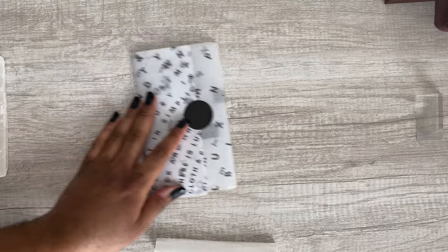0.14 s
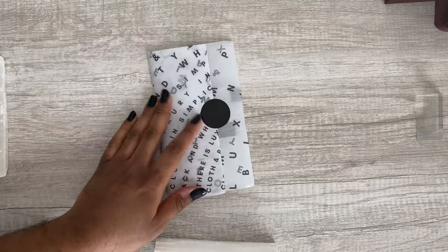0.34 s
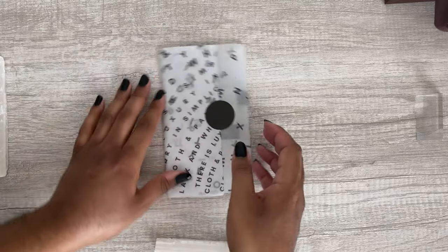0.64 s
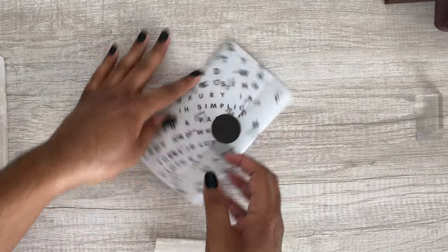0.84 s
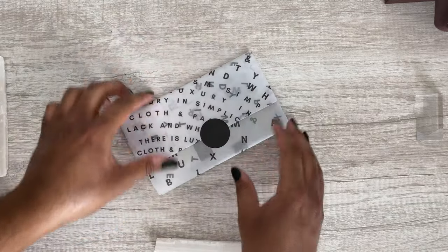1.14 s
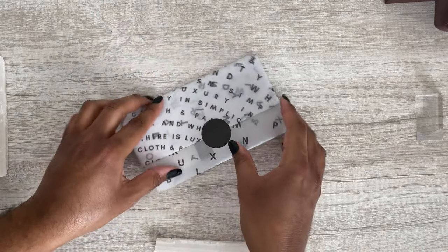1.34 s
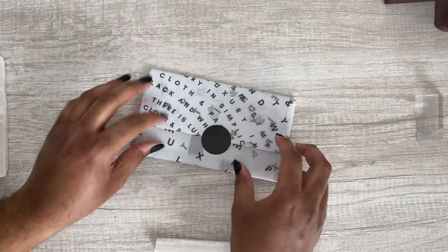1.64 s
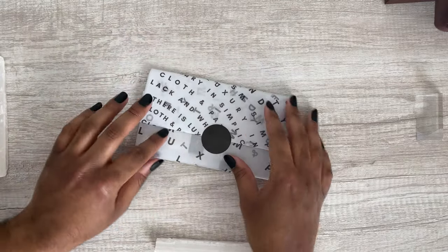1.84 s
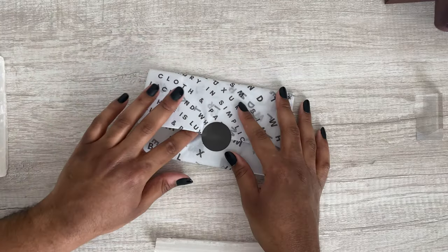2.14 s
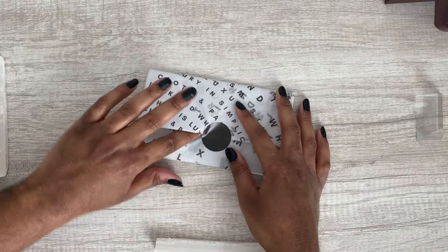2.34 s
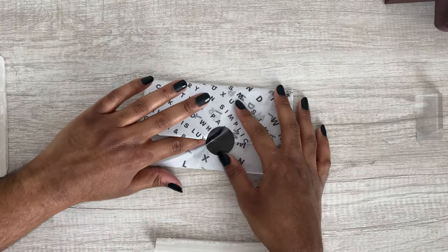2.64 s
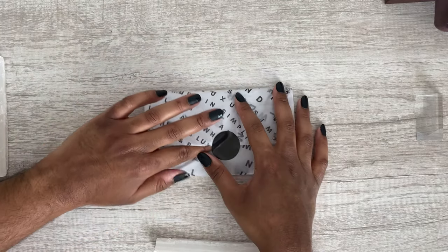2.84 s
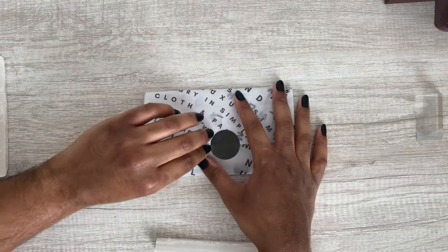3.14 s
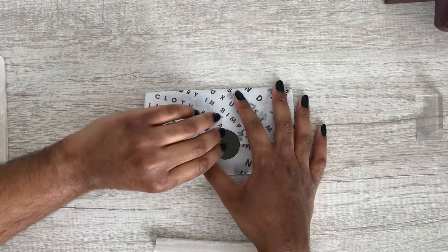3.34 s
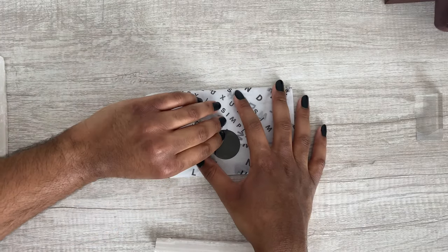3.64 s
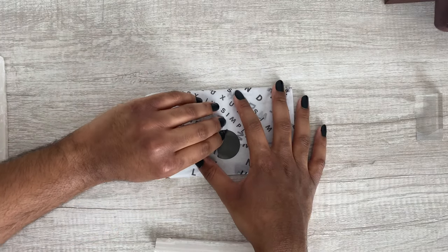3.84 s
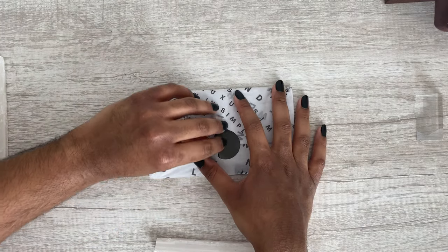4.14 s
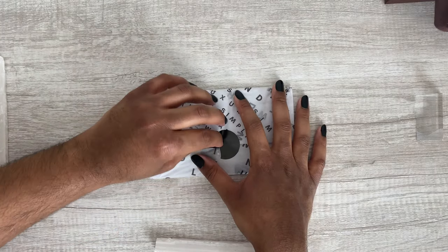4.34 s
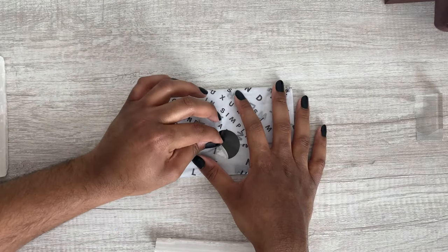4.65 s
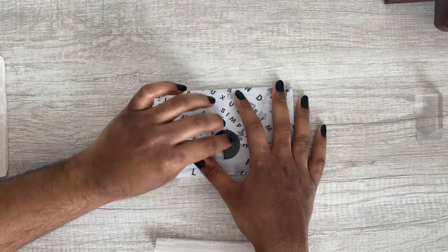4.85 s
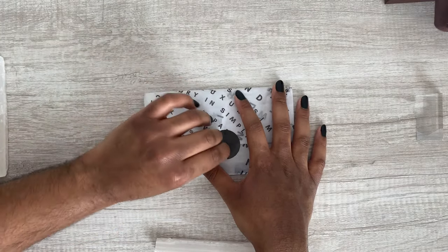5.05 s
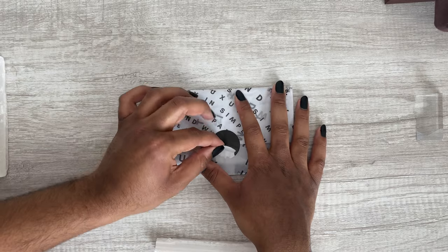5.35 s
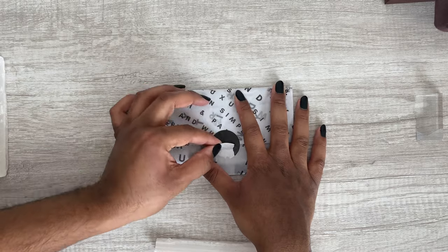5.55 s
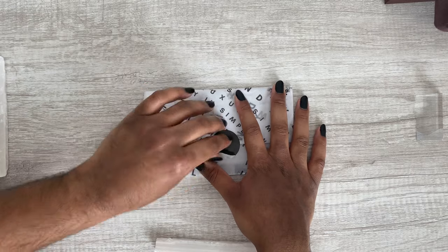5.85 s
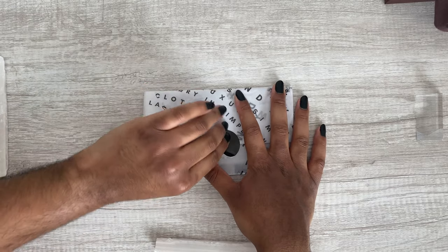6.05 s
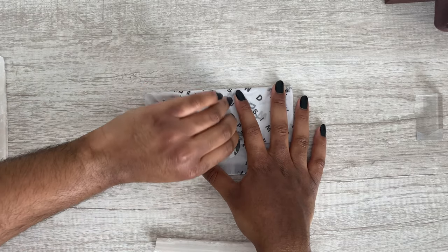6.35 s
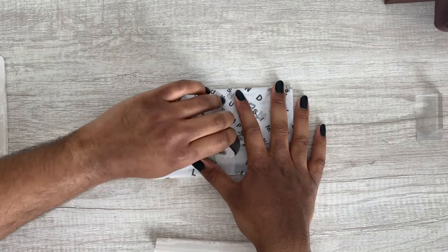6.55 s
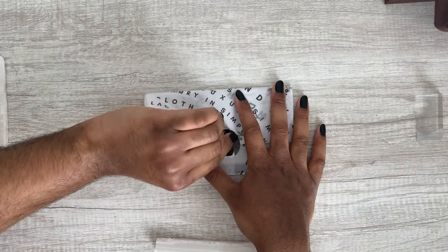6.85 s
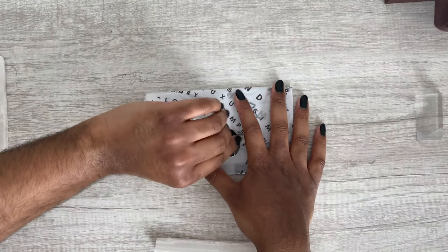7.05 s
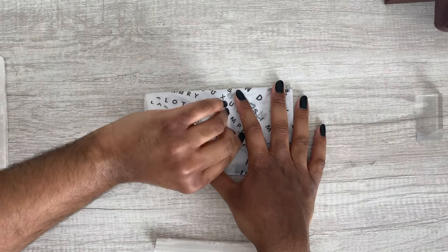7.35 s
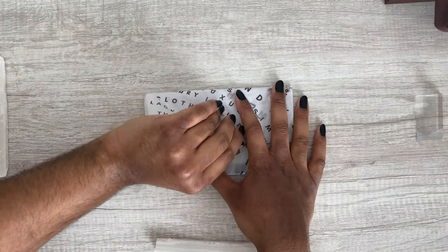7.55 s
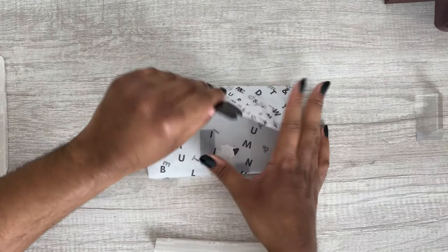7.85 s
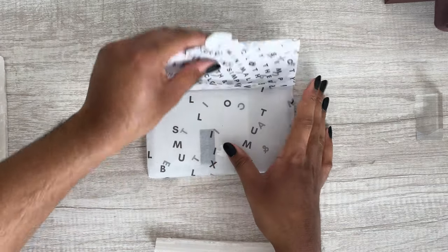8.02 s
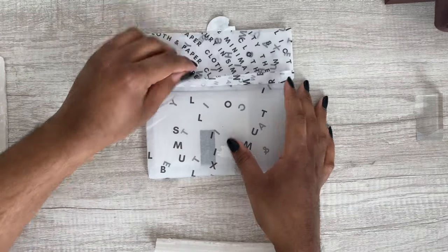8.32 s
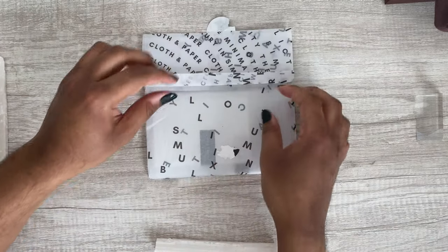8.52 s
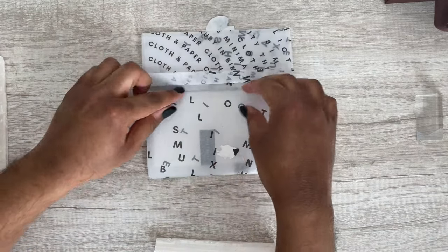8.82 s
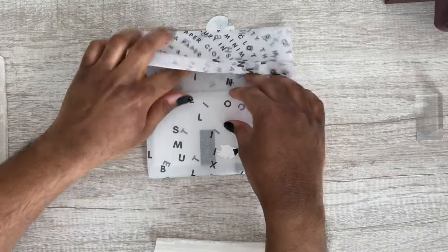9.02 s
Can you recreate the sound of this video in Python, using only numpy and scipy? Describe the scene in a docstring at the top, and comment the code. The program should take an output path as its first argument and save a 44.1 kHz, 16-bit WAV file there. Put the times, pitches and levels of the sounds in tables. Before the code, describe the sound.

A thin, crisp paper packet is slid and turned on a wooden desk with airy swishes, nail taps and a dull thud. Then fingertips press and pick at it in short, irregular crinkles with small snaps and hollow pops, growing busier until the flap peels open in a bright rustle. A low motor hum wavers beneath. Small room, close stereo microphone from above.

```python
"""Tissue paper rustles on a wooden desk as hands slide and turn a packet, pick its sticker and fold the flap open.
Shaped noise makes the hiss of rubbing fibres, clusters of random decays make the crinkle, and noise bursts make
the snaps and nail taps. Short sine modes make hollow pops, and a ringing desk top thuds under packet and fingers.
Beyond the small room a slow motor hums in wavering sine partials, over a faint room tone.
A close pair of microphone ports listens from above."""
import sys
import numpy as np
from scipy import signal
from scipy.fft import rfft, irfft
from scipy.io import wavfile
from scipy.ndimage import uniform_filter1d, map_coordinates

SR = 44100
rng = np.random.default_rng(int(sys.argv[2]) if len(sys.argv) > 2 else 0)


def store_wav(level_fs):
    """Save 16-bit WAV to argv[1]."""
    pcm = np.round(np.clip(np.atleast_2d(level_fs), -1, 1) * 32767)
    wavfile.write(sys.argv[1], SR, pcm.T.astype(np.int16))


N = 404838


def undb(db):
    """Decibels to gain."""
    return 10 ** (np.asarray(db) / 20)


def unit(x):
    """Scale to rms 1."""
    return x / np.sqrt(np.mean(x ** 2))


def curves(table):
    """Draw each column of a table as a value per sample, against seconds in its first column."""
    s, *columns = np.transpose(table)
    return [np.interp(np.arange(N) / SR, s, c) for c in columns]


def per_bin(points):
    """Join (Hz, value) points on a log-frequency axis, one value per spectrum bin."""
    hz, value = np.transpose(points)
    bin_hz = np.arange(N // 2 + 1) * SR / N
    return np.interp(np.log1p(bin_hz), np.log1p(hz), value)


def colour(x, spectrum):
    """Give a sound a spectrum, rms 1."""
    return unit(irfft(rfft(x) * undb(per_bin(spectrum)), N))


def noise(spectrum):
    """Two unrelated noises of one colour, rms 1."""
    return colour(rng.standard_normal((2, N)), spectrum)


def walk(rate):
    """Random levels, each lasting 1 / rate seconds, smoothed twice; rms 1."""
    hold = max(int(SR / rate), 1)
    steps = np.repeat(rng.standard_normal(N // hold + 1), hold)
    return unit(uniform_filter1d(uniform_filter1d(steps, hold), hold)[:N])


def fade(x, decay_s):
    """Give every impulse an exponential tail."""
    return signal.lfilter([1], [1, -np.exp(-1 / (decay_s * SR))], x)


def resonate(x, hz, q):
    """One broad resonance."""
    return signal.lfilter(*signal.iirpeak(min(hz, SR / 3), max(q, 1), fs=SR), x)


def above(x, hz):
    """The part of a sound above a frequency, without phase shift."""
    return signal.sosfiltfilt(signal.butter(2, hz, "high", fs=SR, output="sos"), x)


# Colour of the room tone. Each row: frequency in Hz, relative level in dB per Hz.
ROOM_TONE = [(32, -19), (52, 4), (130, -0.5), (300, -22), (550, -22), (1000, -35.5), (2000, -41),
             (5000, -36.5), (15000, -61)]


def room_tone():
    """Faint steady noise, strongest in the bass."""
    return undb(-38.5) * noise(ROOM_TONE)


# Partials of the hum. Each row: multiple of the pulse rate, relative level in dB.
MOTOR_ORDERS = [(2, -12.5), (4, 0), (5, -8)]
# The motor slows under load. Each row: middle in seconds, drop of the pulse rate in Hz.
MOTOR_SAGS = [(2.55, 0.74), (3.5, 0.97), (6.55, 0.843)]
# Slow level of the hum. Each row: time in seconds, relative level in dB.
HUM_LEVEL = [(0, -41), (.14, -31), (.26, -36), (.58, -27.5), (3.2, -28), (4.5, -28.5), (5.1, -31.5),
             (8.9, -30.5)]
# The hum dips suddenly and recovers. Each row: start in seconds, depth setting in dB.
HUM_DIPS = [(3.54, 14), (4.85, 4.7), (5.72, 8.1), (7.45, 4.1)]
MOTOR_HZ, SAG_WIDTH_S = 26.08, 0.2212  # pulse rate without sag, width of a sag
DIP_FALL_S, DIP_RECOVER_S = 0.024, 0.2


def motor():
    """Low partials of a slow motor that sags now and then; each wavers by itself in level and phase."""
    t = np.arange(N) / SR
    pulse_hz = MOTOR_HZ - sum(drop * np.exp(-((t - s) / SAG_WIDTH_S) ** 2) for s, drop in MOTOR_SAGS)
    level_db = curves(HUM_LEVEL)[0]
    for s, depth_db in HUM_DIPS:
        fall = np.clip((t - s) / DIP_FALL_S, 0, 1)
        level_db = level_db - depth_db * fall * np.exp(-((t - s) / DIP_RECOVER_S) ** 2)
    turn = 2 * np.pi * np.cumsum(pulse_hz) / SR
    hum = 0
    for order, part_db in MOTOR_ORDERS:
        level = undb(part_db + 2.4 * walk(12))
        phase = 2 * np.pi * rng.random() + 0.36 * walk(13)
        hum = hum + level * np.sin(round(order) * turn + phase)
    return np.sqrt(2) * undb(level_db - 1.25) * hum


def room(x, t60_s=0.15, wet_db=-16.0):
    """The short reverberation of a small furnished room: slightly dulled noise that decays exponentially."""
    t = np.arange(SR // 2) / SR
    tail = rng.standard_normal((2, len(t))) * undb(-60 * t / t60_s) * (t > .004)
    tail = fade(tail, .00003)
    tail /= np.sqrt(np.sum(tail ** 2, axis=1, keepdims=True))
    return x + undb(wet_db) * signal.fftconvolve(x, tail, axes=1)[:, :N]


# Phase between the ports. Each row: frequency in Hz, lead of the left in radians.
PORT_PHASE = [(1600, .1), (2700, -.9), (6000, -1), (7500, .4), (8400, 2.9), (9200, 3.4), (10500, 6.2),
              (12000, 6.4), (12900, 9.2), (14100, 9.6), (15100, 12.6)]
# Likeness of the ports. Each row: frequency in Hz, likeness from 0 to 1.
PORT_LIKENESS = [(100, 0.38), (500, 0.62), (1900, 0.85), (3000, 0.62), (5300, 0.33), (7200, 0.43),
                 (8500, 0.99)]
# Balance of the ports. Each row: frequency in Hz, left minus right in dB.
PORT_BALANCE = [(1800, -0.5), (4000, -2), (5700, -8.5), (7200, -1), (8500, 0)]


def ports(x):
    """Shared and unshared sound reach two ports, whose likeness, balance and phase vary with frequency."""
    shared, apart = rfft(x)
    likeness = np.clip(per_bin(PORT_LIKENESS), 0, 1)
    sides = np.array([[1], [-1]])
    pair = shared * np.sqrt((1 + likeness) / 2) + sides * apart * np.sqrt((1 - likeness) / 2)
    pair = pair * undb(sides * per_bin(PORT_BALANCE) / 2)
    return irfft(pair * np.exp(1j * sides * per_bin(PORT_PHASE) / 2), N)


# Modes of the desk top. Each row: frequency in Hz, relative level in dB, 60 dB decay time in seconds.
DESK = [(153, -6, 0.13), (222, -5, 0.12), (246, -2, 0.13), (282, 0, 0.085), (315, 5, 0.061),
        (385, -3, 0.038), (515, -1.5, 0.045), (690, -2, 0.035)]
DESK_RISE_S = .002  # time that the desk top takes to get moving


def desk_ring():
    """The desk top after a sharp tap: decaying modes that take a few milliseconds to build up."""
    t = np.arange(SR // 3) / SR
    modes = sum(undb(db - 60 * t / t60) * np.sin(2 * np.pi * hz * t) for hz, db, t60 in DESK)
    return (1 - np.exp(-t / DESK_RISE_S)) * modes


# Packet and fingers knock the desk. Each row: start in seconds, relative level in dB.
KNOCKS = [(0.566, -17.5), (0.743, -19), (1.132, -6), (1.159, -13), (1.376, -23), (1.421, -14), (3.917, -27),
          (4.158, -27), (4.212, -25.5), (5.368, -23), (5.49, -21.5), (6.116, -26), (6.587, -17),
          (6.968, -21.5), (8.897, -21.5)]


def desk(push_s=0.0007, rattle_db=-7.0, rattle_s=0.016):
    """A soft push rings the desk top; the packet shuffles briefly as it settles."""
    out, ring = np.zeros((2, N + SR)), desk_ring()
    t = np.arange(len(ring)) / SR
    push = t / push_s * np.exp(-2 * t / push_s)
    for s, db in KNOCKS:
        shuffle = rng.standard_normal((2, len(t))) * np.exp(-t / rattle_s)
        thud = undb(rattle_db) * unit(signal.fftconvolve(shuffle, ring[None])[:, :len(t)])
        # row 0 is the sound that both ports share, and the push belongs to it alone
        thud[0] += unit(signal.fftconvolve(push, ring)[:len(t)])
        start = int(s * SR)
        out[:, start:start + len(t)] += undb(db) * thud / np.abs(thud[0]).max()
    return out[:, :N]


# Bulges of the packet that flip. Each row: start in seconds, relative level in dB, pitch in Hz.
POPS = [(0.566, -20, 720), (1.165, -21, 1000), (1.177, -18, 700), (1.398, -15, 800), (1.548, -15, 1000),
        (2.661, -17, 1000), (3.868, -23, 1300), (4.33, -20, 1250), (4.555, -17, 1900), (6.509, -17, 1100),
        (6.585, -17, 1240), (7.776, -15, 764), (7.812, -16, 900), (7.836, -15, 780), (7.934, -15, 1400)]


def pops(ring_s=0.0038, overtone=1.42, overtone_db=-5.0, flutter_db=-3.0, flutter_s=0.005):
    """A bulge flips over with a hollow ring in two short modes, then flutters as it settles."""
    out, t = np.zeros((2, N + SR)), np.arange(SR // 16) / SR
    for s, db, hz in POPS:
        turn = 2 * np.pi * hz * t
        ring = np.exp(-t / ring_s) * (np.sin(turn) - undb(overtone_db) * np.sin(overtone * turn))
        jitter = rng.standard_normal(len(t)) * np.exp(-t / flutter_s)
        flutter = signal.fftconvolve(jitter, ring)[:len(t)]
        sound = unit(ring) + undb(flutter_db) * unit(flutter)
        start = int(s * SR)
        out[0, start:start + len(t)] += undb(db) * sound / np.abs(sound).max()
    return out[:, :N]


# Colour of the packet's ring. Each row: frequency in Hz, relative level in dB per Hz.
PACKET = [(1000, -39), (1700, -13), (2130, 2.5), (2450, -3), (2900, 3), (3450, -7), (3850, -7), (7000, -16)]
# Fingernails tap the packet. Each row: start in seconds, relative level in dB.
TAPS = [(0.545, -17), (0.859, -8), (0.875, -12), (2.195, -15), (2.264, -16), (2.332, -11), (2.379, -12),
        (3.031, -13), (3.111, -9), (3.157, -13), (3.241, -16), (3.637, -19), (3.646, -18), (3.79, -17),
        (3.833, -13), (4.268, -13), (4.702, -20)]


def taps(contact_s=0.0009, tap_db=1.5):
    """A nail lands with a brief scrape: a short burst of noise in the colour of the packet."""
    out, t = np.zeros((2, N + SR)), np.arange(SR // 20) / SR
    ring = noise(PACKET)
    shape = t / contact_s * np.exp(-t / contact_s)
    for s, db in TAPS:
        span = slice(int(s * SR), int(s * SR) + len(t))
        sound = ring[:, span] * shape
        out[:, span] += undb(db + tap_db) * sound / np.abs(sound).max(axis=1, keepdims=True)
    return out[:, :N]


def crinkles(rate, spread_db, decay_s):
    """Energy of tiny buckles, mean near 1: each starts at once and dies away, most small and a few large."""
    sizes = undb(spread_db * np.minimum(rng.exponential(size=N), 3.5))
    energy = fade((rng.random(N) < rate / SR) * sizes ** 2, decay_s)
    # the hand feeds in its work steadily, so a large buckle relieves its neighbours
    return energy / (uniform_filter1d(energy, size=2400) + 0.021 * energy.mean())


# Colour of the rubbing fibres. Each row: frequency in Hz, relative level in dB per Hz.
FIBRES = [(200, -4), (600, -25.5), (1300, -8.5), (2000, -3), (3200, 0.5), (4300, 0.5), (5600, -0.5),
          (10000, -0.5), (15500, -5.5)]
# Creases that snap. Each row: start in seconds, relative level in dB, pitch of the buckling facet in Hz.
SNAPS = [(0.348, -11, 3400), (0.382, -10.5, 2420), (0.993, -21.5, 2780), (1.317, -13, 3800),
         (1.548, -14, 1600), (1.712, -19, 2500), (1.829, -16, 3290), (2.652, -10, 7000), (2.7, -11, 9000),
         (3.429, -9.5, 2000), (3.528, -10, 2790), (4.083, -14, 6000), (4.116, -14, 11100),
         (4.354, -11, 7000), (4.579, -8, 3170), (4.842, -9.5, 4200), (5.382, -10, 5000), (5.51, -11, 4420),
         (5.587, -12, 9000), (5.688, -11.5, 1860), (5.715, -8.5, 1200), (5.986, -17.5, 1500),
         (6.087, -10, 4290), (6.326, -13, 2160), (6.404, -11.5, 7000), (6.819, -10, 3240),
         (7.116, -12.5, 4500), (7.731, -11.5, 1500), (7.777, -12.5, 1800), (7.998, -14, 7100),
         (8.319, -17, 9000), (8.433, -37, 5000), (8.488, -34, 4600), (8.611, -19, 6430), (8.65, -15, 6000),
         (9.024, -9, 1500)]
CRACK_S, FACET_Q = .0009, 1.6  # for a facet at 3000 Hz; both grow with its size


def snaps(run_s=0.0065, run_share=0.29, size_power=0.24):
    """A crease cracks, a run of buckles follows; large, low facets ring longer and hide more of the crack."""
    out, t = np.zeros((2, N + SR)), np.arange(SR // 16) / SR
    crackle = noise(FIBRES) * np.sqrt(.5 + crinkles(rate=1400, spread_db=2.5, decay_s=0.00083))
    for s, db, hz in SNAPS:
        start, size = int(s * SR), (3000 / hz) ** size_power
        shape = (1 - run_share) * np.exp(-t / (CRACK_S * size)) + run_share * np.exp(-t / (run_s * size))
        crack = crackle[:, start:start + len(t)] * shape
        ring = resonate(shape * rng.standard_normal((2, len(t))), hz, FACET_Q * size)
        # a small facet cannot radiate far below its own pitch
        low_cut = signal.butter(2, np.clip(hz / 4, 680, SR / 4), "high", fs=SR)
        sound = signal.lfilter(*low_cut, unit(crack) + size * unit(ring))
        out[:, start:start + len(t)] += undb(db) * unit(sound) * np.sqrt(np.mean(shape ** 2))
    return out[:, :N]


RELEASE_DB_PER_S = 215  # every movement runs out at the same rate


def movement(t, start, attack, length, db, swell_db=0):
    """Energy of one hand movement: an attack, a hold that swells or ebbs, a release."""
    t = t - start
    hold_db = db + swell_db * (np.clip(t / length, 0, 1) - .5)
    # the attack climbs 20 dB over its time, ahead of the start
    edges_db = 20 * np.maximum(-t, 0) / attack + RELEASE_DB_PER_S * np.maximum(t - length, 0)
    return undb(hold_db - np.minimum(edges_db, 80)) ** 2


# Strokes over the paper. Each row: start in seconds, time of the 20 dB rise before it in seconds, length in
# seconds, relative level in dB, swell from start to end in dB, flexing of the sheet relative to the level in dB.
STROKES = [(0.01, 0.058, 0.14, -24.3, -1, -15.5), (0.194, 0.057, 0.17, -33.5, -8, -13),
           (0.4, 0.03, 0.055, -44, -7, -16), (0.542, 0.009, 0.037, -30.5, -5.5, -13),
           (0.624, 0.057, 0.24, -23.2, 3, -10.5), (1.13, 0.004, 0.062, -38, -1, 0),
           (1.243, 0.013, 0.082, -29, 7, -8), (1.403, 0.084, 0.16, -27.7, -3, -8),
           (1.582, 0.038, 0.21, -39, 1, -7.5), (1.835, 0.037, 0.17, -30, -2, -13),
           (2.08, 0.087, 0.112, -27.7, -4, -11), (2.223, 0.022, 0.18, -30, 7, -12),
           (2.418, 0.029, 0.29, -29.7, 4.5, -10.5), (2.757, 0.1, 0.08, -33.5, 1, -6),
           (2.974, 0.12, 0.189, -27.5, -1.5, -8), (3.24, 0.07, 0.27, -29.5, 2, -8),
           (3.573, 0.016, 0.24, -39.0, 1.5, -10.5), (3.831, 0.018, 0.16, -36, -6, -3.5),
           (4.04, 0.067, 0.028, -26.5, 2, -8.5), (4.129, 0.023, 0.14, -32.5, 5, -8),
           (4.327, 0.015, 0.072, -30.5, 2, -3.5), (4.477, 0.094, 0.158, -30.5, 0.5, -5.7),
           (4.76, 0.05, 0.05, -26.5, 3, -4), (4.931, 0.041, 0.05, -36.5, -10, -9.5),
           (5.067, 0.09, 0.2, -28, 4.5, -9), (5.308, 0.081, 0.077, -32, 7, -13),
           (5.435, 0.011, 0.072, -32.5, 6, -10), (5.593, 0.005, 0.08, -36, -3, -17),
           (5.679, 0.065, 0.014, -29.5, 9, -9.5), (5.818, 0.008, 0.15, -46, -5, -7.5),
           (5.98, 0.014, 0.066, -34.7, 4, -9), (6.088, 0.061, 0.26, -26.5, -6.5, -7.5),
           (6.326, 0.018, 0.18, -29.5, 6, -9), (6.586, 0.005, 0.13, -32.7, 6, -9),
           (6.725, 0.04, 0.03, -25.5, 0, -8), (6.815, 0.08, 0.08, -25, -6, -6),
           (6.96, 0.06, 0.1, -26.5, -4, -7), (7.103, 0.021, 0.09, -26.0, 7.5, -10),
           (7.23, 0.071, 0.13, -29.5, 2, -5), (7.403, 0.038, 0.04, -24, -2, -5),
           (7.503, 0.024, 0.214, -33.5, 5.5, -4), (7.666, 0.005, 0.15, -29.0, -4.5, -5.5),
           (7.9, 0.087, 0.08, -31, 3, -5), (8.087, 0.06, 0.035, -22, 0, -8),
           (8.217, 0.014, 0.085, -35, 0.5, -7.5), (8.614, 0.003, 0.12, -38.5, -2, -23),
           (8.762, 0.099, 0.15, -28.0, 7.5, -21), (8.945, 0.08, 0.23, -25.5, 1, -7)]
# The packet is pushed over the desk. Each row: start in seconds, length in seconds, relative level in dB.
SLIDES = [(.58, .21, -39), (1.16, .08, -35), (1.385, .07, -31.5), (2.352, 0.39, -44), (3.854, .42, -47),
          (8.09, .05, -36), (8.89, .2, -43)]
SLIDE_ATTACK_S = .04
DESK_RUB_DB = -22  # any stroke also rubs the desk a little, relative to its own level
UNEVEN_DB, UNEVEN_PER_S = .7, 34  # wobble of the hand pressure: depth and rate


def hands():
    """Strength of rubbing, of flexing and of dragging on the desk, summed over all movements."""
    t, rub, flex = np.arange(0, N, 20) / SR, 0, 0
    for start, attack, length, db, swell_db, flex_db in STROKES:
        energy = movement(t, start, attack, length, db, swell_db)
        rub = rub + energy
        flex = flex + energy * undb(flex_db) ** 2
    slides = sum(movement(t, start, SLIDE_ATTACK_S, length, db) for start, length, db in SLIDES)
    drag = rub * undb(DESK_RUB_DB) ** 2 + slides
    # the pressure of the hands is never quite even
    pressure = undb(UNEVEN_DB * walk(UNEVEN_PER_S))
    return np.sqrt(curves(np.transpose([t, rub, flex, drag]))) * pressure


def facets(x, patchy_db):
    """Facets come and go as the sheet bends: narrow resonances that each last about a tenth of a second."""
    hz, _, cells = signal.stft(x, SR, nperseg=2048)
    field = rng.standard_normal(cells.shape[1:])
    field = unit(uniform_filter1d(uniform_filter1d(field, size=7, axis=0), size=5, axis=1))
    depth_db = patchy_db / np.sqrt(1 + hz[:, None] / 3000)
    return unit(signal.istft(cells * undb(depth_db * field), SR)[1][:, :N])


def bend(x, depth):
    """The resonances of the paper slide up and down as its tension changes: playback at a wandering speed."""
    place = np.cumsum(np.exp(depth * walk(16)))
    return np.array([map_coordinates(row, [place], mode="mirror") for row in x])


def ticks(rate, spread_db, centre_hz, octaves, cycles):
    """Single facets that flip: each rings for a few cycles at its own pitch and size, rms 1."""
    out, t = np.zeros((2, N + SR)), np.arange(SR // 100) / SR
    for when, size, pitch, shared, apart in rng.random((int(rate * N / SR), 5)):
        hz, start = min(centre_hz * 2 ** (octaves * (2 * pitch - 1)), SR / 3), int(when * N)
        ring = np.sqrt(hz) * np.exp(-hz * t / cycles) * np.sin(2 * np.pi * hz * t)
        signs = np.sign([[shared - .5], [apart - .5]])
        out[:, start:start + len(t)] += undb(spread_db * size) * signs * ring
    return unit(above(out[:, :N], centre_hz / 2))


# Colour of the flexing sheet. Each row: frequency in Hz, relative level in dB per Hz.
SHEET = [(200, -15), (480, -13.5), (750, -2), (1150, 3.3), (1500, -1.8), (1900, -2), (4000, -28)]
# Flat hands slide smoothly, then fingertips pick and crumple. Each row: time in seconds, crinkling share 0-1.
CRINKLING = [(0, .08), (.85, .25), (1.6, .6), (4.4, .72), (9.18, .52)]
# The packet rings while pressed flat. Each row: time in seconds, relative strength of its ring in dB.
PRESSED = [(0, -6), (.6, -3.5), (1.9, -16), (2.2, 3), (2.75, 2), (3.8, -14.5), (7.5, -10.5), (9.18, -14)]
# Treble of the hiss. Each row: time in seconds, change of level in dB, around which it flickers.
TREBLE = [(.1, -1.5), (.5, -4), (.95, 2), (1.16, -8), (1.28, -1), (2.5, 3.5), (3.5, 0), (6.6, 1.5),
          (7.25, -2), (8.2, 1.2)]
# Body of the hiss; two strokes before the last sound thin, then the body returns.
# Each row: time in seconds, change of level in dB.
BODY = [(8.4, 0), (8.65, -7), (8.84, -5), (8.96, 0)]
BODY_HZ, TREBLE_HZ = 2000, 7000  # the body lies below, the treble above


def paper(hiss_db=4.8, sheet_db=2.0, ring_db=2.0, tick_db=-6.5):
    """Fibres rub in a smooth hiss, buckles break it into grains and ticks, larger folds flex the whole sheet."""
    rubbing, flexing, dragging = hands()
    share = np.clip(curves(CRINKLING)[0], 0, .95)
    pressed = undb(curves(PRESSED)[0])
    fine = crinkles(rate=900, spread_db=3.0, decay_s=0.00055)
    folds = crinkles(rate=350, spread_db=3.2, decay_s=0.0016)
    # fingers catch and slip, and each slip lets go a run of buckles
    slips = crinkles(rate=220, spread_db=1.8, decay_s=0.0072)

    def grain(buckles):
        """Even rubbing with its share of buckling."""
        return np.sqrt(1 - share + share * slips * buckles)

    # the smaller the buckle, the higher its sound
    fibres = facets(noise(FIBRES), patchy_db=4.0) * grain(0.72 * fine + 0.15 * folds)
    flips = ticks(rate=130, spread_db=14, centre_hz=3700, octaves=1.5, cycles=1.6)
    fibres += undb(tick_db) * share * flips
    treble = above(fibres, TREBLE_HZ)
    body = fibres - above(fibres, BODY_HZ)
    middle = fibres - treble - body
    flicker_db = 2.4 * walk(24)
    hiss = middle + body * undb(curves(BODY)[0]) + treble * undb(curves(TREBLE)[0] + flicker_db)

    packet = pressed * undb(ring_db) * facets(noise(PACKET), patchy_db=4.0) * grain((fine + folds) / 2)
    sheet = facets(bend(noise(SHEET), depth=.07), patchy_db=3.0) * grain(0.55 * fine + 0.65 * folds)
    drag = unit(signal.fftconvolve(rng.standard_normal((2, N)), desk_ring()[None])[:, :N])
    # pressed flat, the packet takes its ring out of the hiss
    rubbed = (undb(hiss_db) * hiss + packet) / np.sqrt(1 + pressed ** 2)
    return rubbing * rubbed + flexing * undb(sheet_db) * sheet + dragging * drag


def scene():
    """Paper and desk in the room, over the room tone and the hum, which is alike on both sides."""
    close = paper() + snaps() + taps() + pops() + desk()
    return ports(room(close) + room_tone()) + motor()


def record(dry):
    """The recorder cuts the top with a steep low-pass at 15850 Hz."""
    return signal.sosfilt(signal.ellip(10, .2, 70, 15850, fs=SR, output="sos"), dry)


dry = scene()
out = record(dry)
store_wav(out)
```